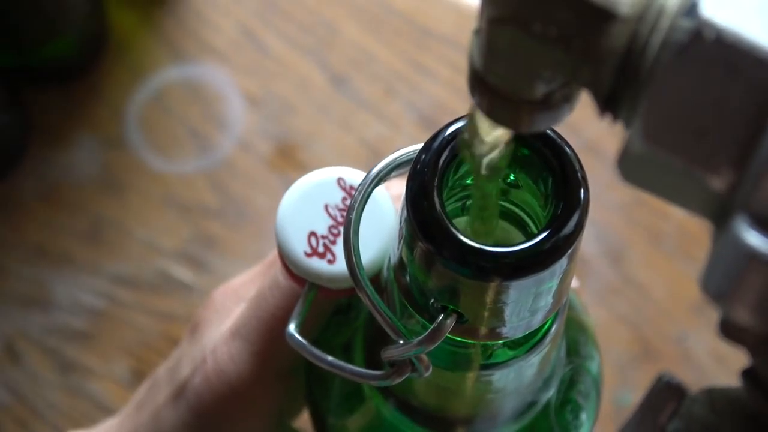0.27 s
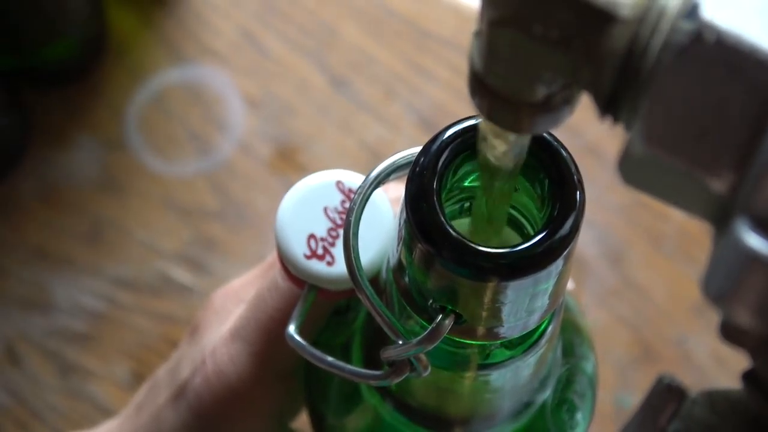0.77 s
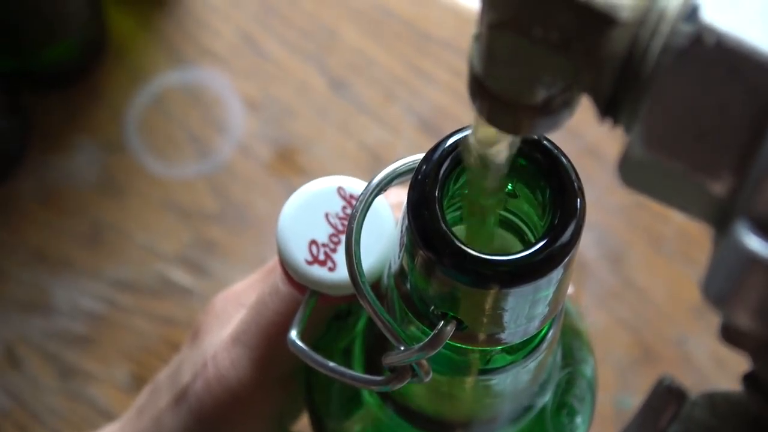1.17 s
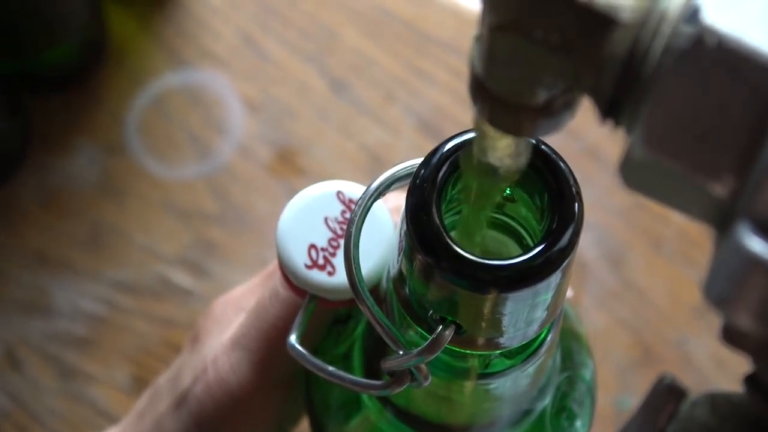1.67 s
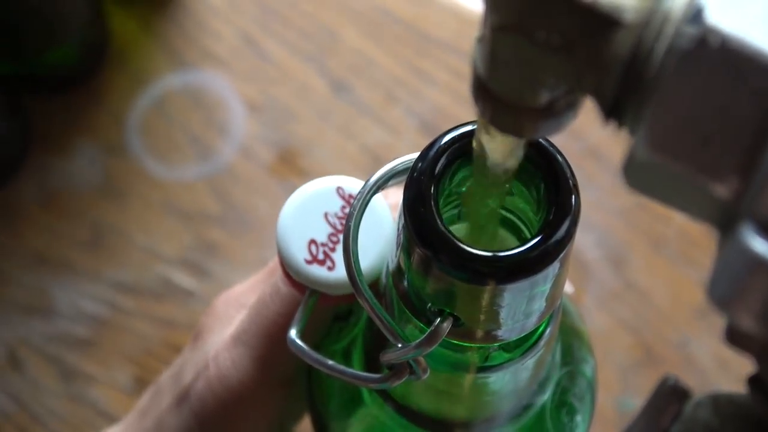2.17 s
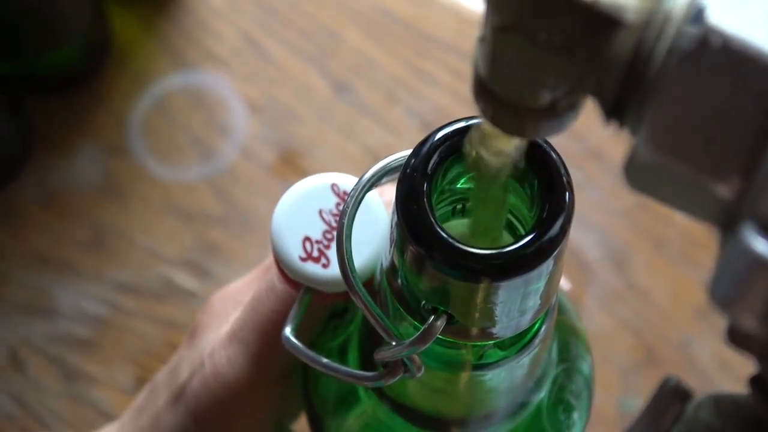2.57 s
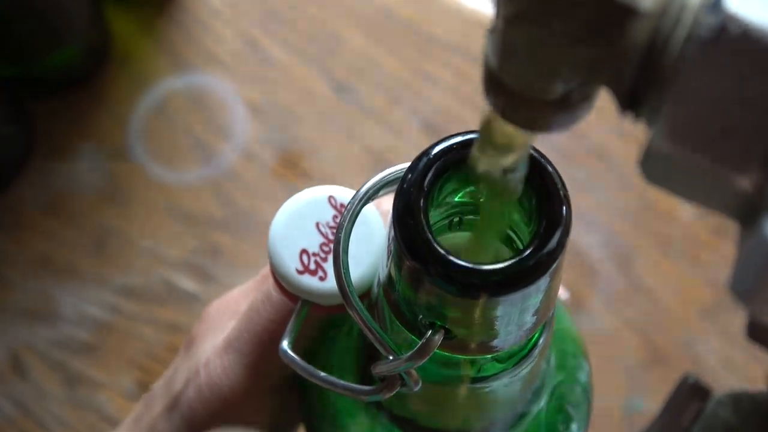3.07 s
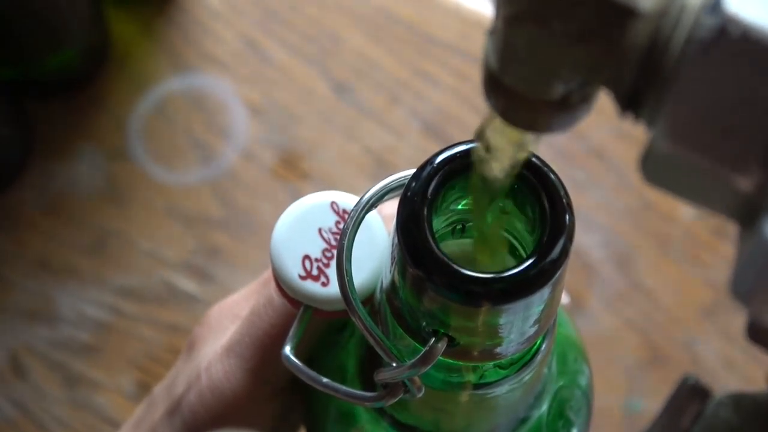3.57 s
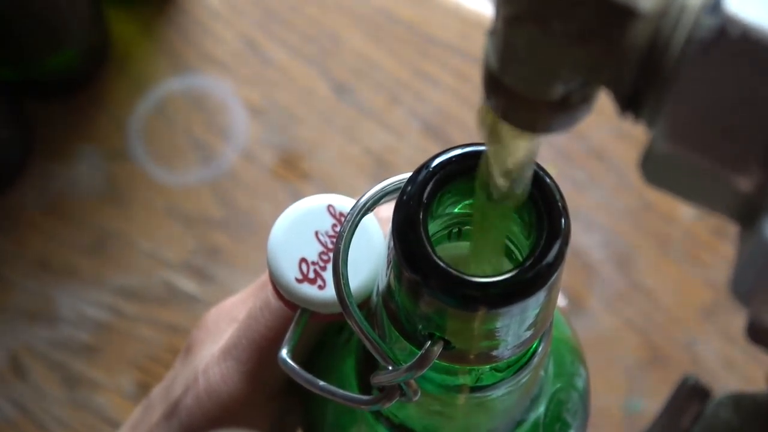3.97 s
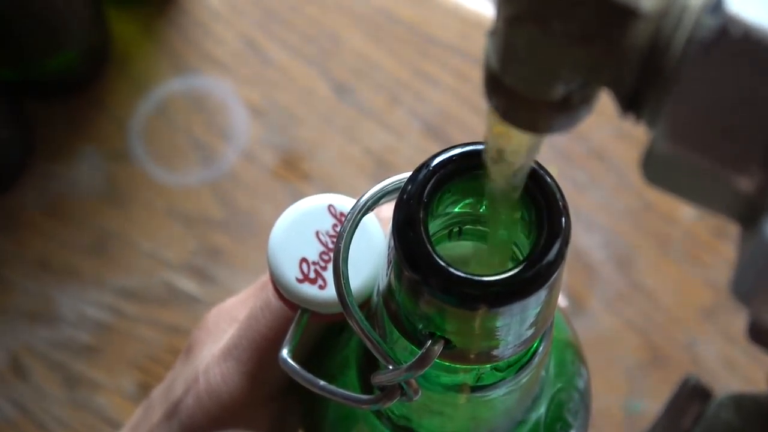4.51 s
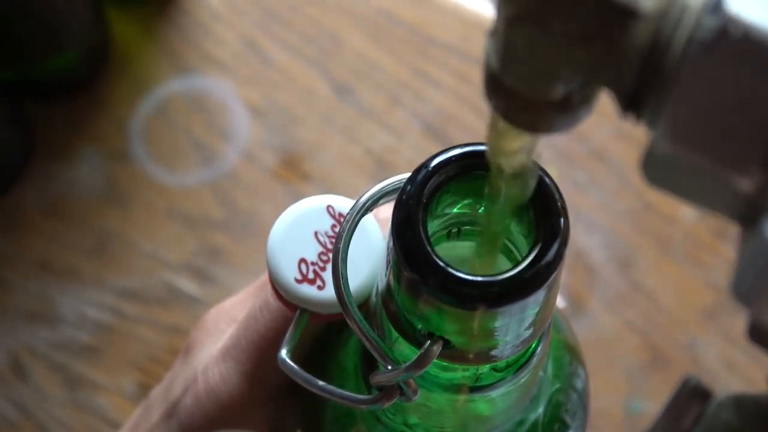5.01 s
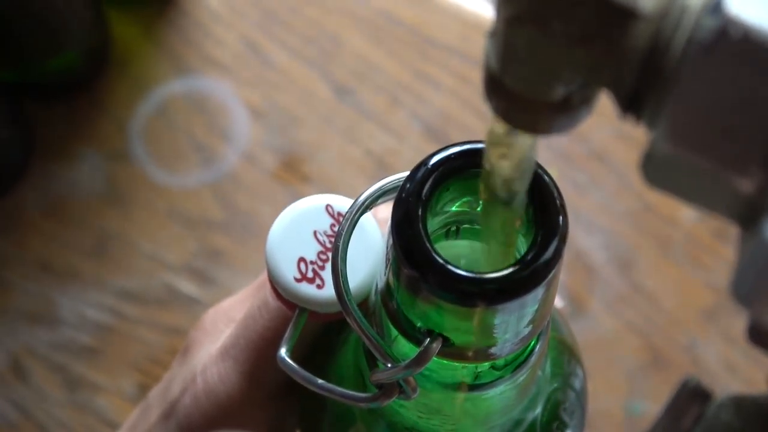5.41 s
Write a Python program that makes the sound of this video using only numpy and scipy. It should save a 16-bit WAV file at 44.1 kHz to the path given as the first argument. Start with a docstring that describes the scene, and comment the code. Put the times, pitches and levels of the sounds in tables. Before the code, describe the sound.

In a quiet kitchen, heard very close in narrow stereo, liquid runs from a metal spigot into a glass bottle. Faint splats grow into dense, sharp, glassy splashing with small pings that creep up in pitch. At about three seconds foam smothers the ringing, leaving low bubbling glugs, a soft churn and faint crackle, with fizz fading away.

```python
"""Sharp, bright splats come first: a stream from a spigot hits the bottom of a glass bottle.
Place: a quiet kitchen; distance: close; microphone: two ports a small way apart.
The splats (noise bursts through the bottle's modes) ring its air, whose notes creep up as it fills.
Then foam closes over the surface, damps the ringing and leaves low glugs (dying sines), a churn
(knocked resonances) and faint crackle and fizz (small bursts and hiss)."""
import sys
import numpy as np
from scipy import signal
from scipy.fft import rfft, irfft
from scipy.io import wavfile
from scipy.ndimage import uniform_filter1d

SR = 44100
rng = np.random.default_rng(int(sys.argv[2]) if len(sys.argv) > 2 else 0)


def wrap_up_sound(samples):
    """Save the sound to the file named by the first command line argument, as 16-bit audio."""
    columns = np.atleast_2d(samples).T
    # keep every value between -1 and 1, then stretch to whole-number steps
    tamed = np.clip(columns, -1, 1)
    steps = np.round(tamed * 32767).astype(np.int16)
    wavfile.write(sys.argv[1], SR, steps)


N = 249165
FOAM_S = 3.055  # the foam closes over the surface


def amp(db):
    """Amplitude factor of a level in dB."""
    return 10 ** (np.asarray(db) / 20)


def evened(x):
    """Scales a signal to an rms of 1."""
    return x / np.sqrt(np.mean(x ** 2) + 1e-20)


def read(points, hz):
    """Reads a curve over frequency, straight between points on a log scale."""
    f, value = np.transpose(points)
    return np.interp(np.log(hz + 1), np.log(f + 1), value)


def along(rows, column):
    """One column of a curve over time, sample by sample."""
    rows = np.array(rows)
    return np.interp(np.arange(N) / SR, rows[:, 0], rows[:, column])


def by_surface(s, is_open, under_foam):
    """Picks one value before the foam closes and another from then on."""
    return np.where(s < FOAM_S, is_open, under_foam)


def highpass(x, order, hz):
    """Takes away what lies below hz."""
    return signal.sosfilt(signal.butter(order, hz, "high", fs=SR, output="sos"), x)


def mode(f, hz, width_hz):
    """Response of a resonance, 1 at its centre."""
    return 1j * f * width_hz / (hz ** 2 - f ** 2 + 1j * f * width_hz + 1e-9)


def resonate(x, hz, width_hz):
    """A resonance on a moving pitch: shifts the curve hz down to zero, smooths, and shifts back."""
    turn = np.exp(2j * np.pi * np.cumsum(hz) / SR)
    r = np.exp(-np.pi * width_hz / SR)
    smooth = signal.lfilter([1 - r], [1, -r], x / turn)
    return 2 * (turn * smooth).real


def lay(s, sounds):
    """Sums short sounds at their times."""
    out = np.zeros(N + sounds.shape[1])
    starts = np.clip(np.round(s * SR).astype(int), 0, N - 1)
    np.add.at(out, starts[:, None] + np.arange(sounds.shape[1]), sounds)
    return out[:N]


def shaped(spectrum, patchy_db):
    """Noise of a given spectrum with drifting patches, rms 1."""
    hz = np.fft.rfftfreq(1024, 1 / SR)
    a, b, patches = rng.standard_normal((N // 256 + 5, 513, 3)).T
    patches = uniform_filter1d(patches, size=10, axis=0)
    patches = evened(uniform_filter1d(patches, size=10, axis=1))
    cells = (a + 1j * b) * amp(read(spectrum, hz)[:, None] + patchy_db * patches)
    return evened(signal.istft(cells, nperseg=1024, noverlap=768)[1][:N])


# damped air modes over foam: f/Hz, width/Hz, level/dB
FOAM_MODES = [(1800, 365, 19), (2285, 290, 18), (3080, 400, 15.5), (4840, 89, -2), (4900, 150, -15),
              (7670, 1400, 2.5), (10300, 1750, -1), (15300, 1800, -12)]


def foamed(f):
    """Response of the damped air over foam; neighbouring modes have opposite signs."""
    return sum((-1) ** k * amp(db) * mode(f, hz, w) for k, (hz, w, db) in enumerate(FOAM_MODES))


def gap(f):
    """A narrow band, held back, that never leaves the bottle mouth."""
    return 1 - mode(f, 4278, 990)


# air and glass modes of the empty bottle:
# f/Hz, rise/(Hz per s), width/Hz, level/dB, level drift/(dB per s as the liquid rises)
OPEN_MODES = [(1203, 48.5, 13.4, -19, 11), (1828, 54.5, 38, -5.5, 9), (2828, 48, 28, 4, 6.5),
              (3114, 47, 38, -9.5, 9.5), (3335, 65, 36, 2, 6), (4220, 52, 82, -6.5, 5),
              (4900, 2, 35, -2, 4.5), (6020, 18, 150, -11.5, 6.5), (6667, -64, 107, -1, 3.5),
              (7430, 65, 175, -7, 5.5), (7905, 12, 21, 14.5, -13.5), (8720, 10, 53, -1, 3),
              (9560, 9, 145, -7.5, 7), (10070, -40, 70, -3.5, 5), (11020, 18, 73, 2.5, 1.5),
              (12320, -7, 660, 1.5, 1.7), (13800, -9, 1190, -1.5, 0), (7900, -13, 1700, -16, 4.5)]
SIZE, STEP_S = 4096, 0.04  # burst length in samples; time between states of the bottle
WIDENING_PER_S, WIDENING_POWER = 0.34, 1.58  # at 2 kHz; the power makes high modes widen most
SLOSH_SHARE, SLOSH_DB = 0.005, 3.5  # random detuning, as a share of pitch, and unevenness in level


def bottle(s):
    """Response of the air in the bottle at each time s; the rising, frothing liquid damps the modes
    more and more, and its moving surface detunes them and rings them unevenly."""
    f = np.fft.rfftfreq(SIZE, 1 / SR)
    steps = np.arange(0, FOAM_S, STEP_S)[:, None]
    ringing = 0
    for k, (hz, rise, w, db, drift_db) in enumerate(OPEN_MODES):
        detune, strength = rng.standard_normal((2, len(steps), 1))
        pitch = (hz + rise * steps) * (1 + SLOSH_SHARE * detune)
        width = w * (1 + WIDENING_PER_S * steps * (hz / 2000) ** WIDENING_POWER)
        level_db = db + drift_db * steps + SLOSH_DB * strength
        ringing = ringing + (-1) ** k * amp(level_db) * mode(f, pitch, width)
    states = np.vstack([ringing, foamed(f)]) * gap(f)
    return states[by_surface(s, s // STEP_S, len(steps)).astype(int)]


LUMPS_DB, LUMPS_ONSET_SHARE = 8.5, 0.052  # a burst starts clean and breaks up after this share of its t60


def bursts(s, hz, t60, spread, snap, swell=0.025):
    """A snap and a lumpy puff of noise around hz that swells and dies, rung through the bottle; peak 1."""
    t, f = np.arange(SIZE // 4) / SR, np.fft.rfftfreq(SIZE, 1 / SR)
    noise, lumps = rng.standard_normal((2, len(s), len(t)))
    lumps = evened(uniform_filter1d(lumps, size=50, axis=1))  # droplets land unevenly within a splat
    age = t / t60[:, None]
    lumps_db = LUMPS_DB * lumps * np.minimum(age / LUMPS_ONSET_SHARE, 1)
    puff = noise * amp(lumps_db - 60 * age ** 1.06) * (1 - np.exp(-age / swell))
    puff[:, 0] += snap
    band = mode(f, hz[:, None], spread * hz[:, None]) ** 2
    out = irfft(rfft(puff, SIZE) * band * bottle(s), SIZE)
    out *= np.clip((SIZE - np.arange(SIZE)) / 512, 0, 1)  # fade the tail out
    return out / abs(out).max(1, keepdims=True)


# sharp splats of the broken stream: t/s, peak level/dB, centre f/Hz
SPLATS = [(0.072, -34, 12100), (0.129, -27, 8800), (0.174, -39, 10800), (0.219, -34.5, 8000),
          (0.2374, -29, 10400), (0.2623, -31, 11900), (0.288, -30.5, 6670), (0.306, -25, 11500),
          (0.327, -37, 7050), (0.365, -24.5, 8700), (0.395, -31.5, 9400), (0.4202, -27.5, 5800),
          (0.454, -40, 7800), (0.552, -36, 10600), (0.605, -29.5, 7000), (0.624, -32, 11500),
          (0.684, -30, 7150), (0.648, -24, 6250), (0.7006, -25, 10700), (0.7434, -26, 8800),
          (0.7564, -22.5, 7700), (0.804, -24.5, 7300), (0.818, -33, 8700), (0.8694, -14, 7550),
          (0.89, -33, 7400), (0.933, -26.5, 7940), (0.9627, -15, 5750), (1.058, -24, 8690),
          (1.081, -27, 7500), (1.1102, -28, 10050), (1.142, -28, 8050), (1.172, -22.5, 9800),
          (1.2059, -17, 7440), (1.248, -19, 5700), (1.267, -18, 9000), (1.288, -37, 9500),
          (1.373, -23, 9000), (1.619, -32, 9500), (1.3089, -22, 7060), (1.33, -24.5, 7450),
          (1.3604, -30, 8050), (1.383, -20.5, 10300), (1.41, -25, 9100), (1.449, -14, 9500),
          (1.4556, -11, 10200), (1.4842, -17.5, 5470), (1.51, -20.5, 8100), (1.561, -18.5, 9800),
          (1.6339, -18, 8850), (1.6606, -33, 7800), (1.682, -13, 6870), (1.7454, -27.5, 10300),
          (1.816, -20, 9400), (1.845, -22, 7450), (1.9018, -31, 9900), (1.93, -22, 8200),
          (1.9943, -16.5, 8100), (2.039, -19, 7300), (2.0972, -25.5, 8750), (2.1294, -17.5, 8050),
          (2.1546, -16, 6500), (2.1842, -21, 7060), (2.207, -22, 5700), (2.2253, -20, 8050),
          (2.246, -26, 10100), (2.2648, -26.5, 7050), (2.2923, -15, 8230), (2.341, -10.5, 9700),
          (2.3694, -24.5, 8800), (2.397, -19.5, 8100), (2.427, -20.5, 7900), (2.444, -23, 8550),
          (2.513, -23, 8000), (2.5356, -19.5, 7200), (2.5636, -21.5, 7300), (2.583, -16, 9800),
          (2.6154, -10.5, 5480), (2.6589, -18, 8050), (2.7637, -15.5, 9200), (2.8178, -15.5, 8600),
          (2.8851, -17.5, 7500), (2.9115, -16.5, 8700), (2.9538, -24, 8560), (2.9885, -24, 5340),
          (3.0165, -28.5, 7800), (3.0444, -21, 7000), (3.1395, -29.5, 8100), (3.1807, -36, 7100),
          (3.4845, -36.5, 10900), (3.5558, -34, 9250), (3.7064, -32.5, 7760), (3.7395, -31.5, 10700),
          (3.812, -33.5, 7350), (3.898, -33, 5500), (3.9765, -31.5, 6500), (4.015, -30.5, 7800),
          (4.0503, -34, 7200), (4.338, -34.5, 5500), (4.533, -36.5, 7240), (4.6872, -34.5, 5430),
          (4.9625, -41, 7140), (5.145, -46, 7600)]


def splats():
    """Bright wide bursts of the stream; louder splats start with a harder snap."""
    s, db, hz = np.transpose(SPLATS)
    snap = 18 * amp(0.03 * (db + 20.5))
    t60 = np.full(len(s), 0.028)
    return lay(s, amp(db)[:, None] * bursts(s, hz, t60, spread=0.69, snap=snap))


# pops of trapped air pockets that ring the bottle: t/s, peak level/dB, centre f/Hz
POPS = [(0.329, -42, 4800), (0.3672, -38, 2930), (0.42, -49, 4970), (0.577, -40.5, 3360),
        (0.767, -32.5, 3520), (0.8703, -17, 3160), (0.9543, -24, 4850), (0.932, -30.5, 2670),
        (0.96, -49, 3400), (1.0084, -30, 2900), (1.0791, -19.5, 4900), (1.1369, -28.5, 3500),
        (1.2052, -21.5, 4740), (1.222, -18.5, 3740), (1.308, -30, 3440), (1.3594, -34, 3580),
        (1.3717, -26, 2830), (1.4018, -28, 2880), (1.484, -18.5, 5130), (1.5282, -23.5, 3700),
        (1.562, -34, 2870), (1.582, -28.5, 3300), (1.634, -31.5, 3570), (1.7598, -44, 2980),
        (1.787, -36, 2930), (1.851, -26, 3080), (1.885, -37, 2920), (1.908, -30.5, 2920),
        (2.0383, -29.5, 3700), (2.101, -25, 3830), (2.127, -53, 3020), (2.1438, -31, 2960),
        (2.192, -28.5, 2960), (2.2677, -34, 3020), (2.2924, -22, 3050), (2.3393, -29.5, 2970),
        (2.3714, -32, 2970), (2.4736, -33.5, 2970), (2.5, -30, 3180), (2.5464, -28, 3580),
        (2.614, -26, 3470), (2.6835, -33.5, 2900), (2.7325, -31.5, 3600), (2.764, -35, 3600),
        (2.805, -32, 3000), (2.825, -28, 2960), (2.96, -38, 3600), (2.9887, -34.5, 2980),
        (3.202, -36, 1880), (3.556, -39, 1880), (3.695, -38, 1930), (3.74, -43, 1830), (3.794, -55, 3200),
        (3.8587, -40, 2010), (3.859, -36, 3470), (3.8998, -37, 3070), (3.902, -41, 2200),
        (3.977, -31.5, 3660), (4.016, -39, 1930), (4.0388, -39.5, 1760), (4.054, -33, 3820),
        (4.065, -40.5, 2080), (4.081, -43, 1900), (4.115, -40, 2100), (4.161, -48, 2280),
        (4.433, -51, 3300), (4.874, -41.5, 3240)]


def pops():
    """Narrower bursts that leave the low air modes ringing; large, low pockets take longer to burst."""
    s, db, hz = np.transpose(POPS)
    t60 = 0.008 * (3000 / hz) ** 1.6 * by_surface(s, 1, 0.76)  # shorter under foam
    return lay(s, amp(db)[:, None] * bursts(s, hz, t60, spread=0.31, snap=1.8))


# pings of the clearest standing waves, one list for each wave: t/s, level/dB
PINGS = [
    [(0.764, -42), (0.8338, -46), (0.8707, -52), (1.0099, -39), (1.2484, -51), (1.2668, -44), (1.3332, -44),
     (1.4484, -40), (1.5162, -46), (1.6599, -40), (1.6754, -40), (1.6968, -36.5), (1.7377, -45),
     (1.7597, -44), (1.8171, -32), (1.8615, -40), (1.8799, -36.5), (1.9697, -43), (2.1099, -64),
     (2.1433, -49), (2.1832, -42), (2.2092, -34.5), (2.2925, -35), (2.3419, -32), (2.4446, -45),
     (2.5429, -36), (2.5848, -31.5), (2.6187, -35), (2.6547, -38), (2.6786, -38), (2.712, -32),
     (2.7315, -31), (2.7824, -46), (2.8188, -38), (2.8662, -36), (2.8981, -36), (2.9405, -47),
     (2.9904, -35.5)],
    [(0.3502, -52), (0.458, -40), (0.5233, -43), (0.6071, -46), (0.6266, -39.5), (0.7269, -38),
     (0.7658, -40), (0.8351, -36), (0.901, -60), (0.9169, -34), (0.9967, -36), (1.1349, -30.5),
     (1.1718, -40), (1.2212, -39), (1.308, -35), (1.3295, -31.5), (1.3644, -44), (1.3749, -31.5),
     (1.4108, -52), (1.4482, -35.5), (1.5196, -43), (1.5425, -37), (1.5605, -35.5), (1.5969, -35),
     (1.6602, -36.5), (1.7001, -37), (1.751, -34), (1.8169, -48), (1.8802, -43), (1.9042, -36),
     (1.9276, -34), (1.9695, -40.5), (2.0987, -56), (2.1401, -43), (2.1681, -39), (2.1925, -38),
     (2.2279, -36.5), (2.2699, -39), (2.2988, -32.5), (2.3412, -34), (2.406, -50), (2.4295, -42),
     (2.4474, -33), (2.5198, -35), (2.5422, -32), (2.5647, -33), (2.5871, -46), (2.6151, -32),
     (2.6525, -35), (2.6829, -32), (2.7109, -42), (2.7518, -35), (2.7647, -33), (2.7967, -49),
     (2.8091, -39), (2.8316, -30), (2.9887, -36), (3.0167, -38)],
    [(0.365, -49), (0.4268, -47), (0.4952, -46), (0.5406, -44), (0.574, -41), (0.6408, -40), (0.7256, -42),
     (0.8708, -25), (0.9342, -36), (1.0065, -30), (1.1332, -49), (1.2215, -39), (1.256, -36), (1.3304, -40),
     (1.3732, -37), (1.4026, -31.5)],
    [(0.3271, -51), (0.3665, -43), (0.4203, -50), (0.5755, -42), (0.6408, -42), (0.7017, -53),
     (0.7256, -42), (0.7561, -40), (0.8703, -26), (0.9531, -42), (1.008, -39), (1.0788, -48),
     (1.1372, -35.5)],
    [(0.3283, -49), (0.4196, -54), (0.4949, -63), (0.5752, -53), (0.7548, -47), (0.8167, -40), (0.871, -39),
     (0.9543, -27), (1.0796, -28), (1.1723, -38), (1.2048, -32), (1.2477, -41), (1.307, -51), (1.3649, -47),
     (1.4442, -49), (1.4836, -27)],
]
# those waves: f/Hz in the empty bottle, rise/(Hz per s), t60/s, change of t60/(s per s)
WAVES = [(1211, 48.8, 0.12, -0.015), (1811, 56.8, 0.15, -0.039), (2800, 57, 0.085, -0.02),
         (3326, 55, 0.065, -0.017), (4894, 39, 0.074, -0.025)]


def pings():
    """Drops strike one standing wave alone: a clean dying note, pitched higher as the liquid rises."""
    t, out = np.arange(8192) / SR, 0
    for rows, (hz, rise, t60, change) in zip(PINGS, WAVES):
        s, db = (c[:, None] for c in np.transpose(rows))
        detune, phase = rng.random((2, len(s), 1))
        pitch = (hz + rise * s) * (1 + 0.0025 * (2 * detune - 1))
        shape = (1 - np.exp(-t / 0.00094)) * amp(-60 * t / (t60 + change * s))
        out = out + lay(s[:, 0], amp(db) * shape * np.sin(2 * np.pi * (pitch * t + phase)))
    return out


# between the events: t/s, fine spray level/dB, small pops level/dB
PATTER = [(0.0, -75, -85), (0.3, -60.5, -63.5), (0.9, -45.5, -53), (1.8, -52, -48.5), (2.95, -47, -48.5),
          (3.12, -58.5, -56), (4.1, -53.5, -59), (4.2, -57.5, -56.5), (5.0, -60.5, -63), (5.65, -65, -66)]
FOAM_LOW_HZ, FOAM_LOW_RISE = 1540, 260  # lowest pop that gets through the foam; its climb in Hz per s


def patter(column, low_hz, high_hz, count, uneven_db, foam_uneven_db, spread, t60):
    """Many small random bursts, a few of them larger; under foam they are shorter and more alike."""
    when, pitch, size = rng.random((3, count))
    s = when * N / SR
    foam_low_hz = np.maximum(low_hz, FOAM_LOW_HZ + FOAM_LOW_RISE * (s - FOAM_S))
    low_hz = by_surface(s, low_hz, foam_low_hz)
    hz = low_hz * (high_hz / low_hz) ** pitch
    size_db = by_surface(s, uneven_db, foam_uneven_db) * (np.minimum(-np.log(size + 1e-9), 3) - 1.5)
    t60 = t60 * by_surface(s, 1, 0.6)
    grains = amp(size_db)[:, None] * bursts(s, hz, t60, spread, snap=0.24, swell=0.13)
    return amp(along(PATTER, column)) * evened(lay(s, grains))


def fine_spray():
    """Small bright wide bursts between the splats."""
    return patter(1, 4940, 10900, count=2200, uneven_db=10.5, foam_uneven_db=6.5, spread=0.72, t60=0.02)


def small_pops():
    """Small lower, narrower bursts between the pops."""
    return patter(2, 1140, 4980, count=1400, uneven_db=4.0, foam_uneven_db=2.5, spread=0.37, t60=0.036)


# finest spray, spectrum: f/Hz, relative level/dB per Hz
MIST = [(4300, -33), (5000, -3), (6000, -8), (8000, 1), (11000, 0.5), (13000, 6), (16000, -2.5)]
# its loudness: t/s, level/dB before the flicker
MIST_LEVEL = [(0.1, -72), (0.4, -67), (0.62, -60), (0.9, -56.5), (1.6, -54.5), (2.2, -64.5), (3.03, -72),
              (3.08, -78)]


def mist():
    """The finest droplets merge into a flickering hiss that sinks away as the foam closes."""
    flicker = uniform_filter1d(rng.standard_normal(N), size=300)
    flicker = evened(uniform_filter1d(flicker, size=300))
    return amp(along(MIST_LEVEL, 1) + 5.0 * flicker) * shaped([(100, -90)] + MIST, patchy_db=2.5)


# large bubbles under the surface: t/s, peak level/dB before the bass cuts, f/Hz
GLUGS = [(1.816, -40, 753), (2.291, -41.5, 633), (2.369, -34.5, 550), (2.443, -50, 734), (2.474, -49, 690),
         (2.508, -54, 590), (2.541, -40.5, 650), (2.562, -45, 804), (2.66, -34, 496), (2.662, -53, 826),
         (2.693, -40, 520), (2.731, -36, 433), (2.732, -40, 690), (2.826, -43.5, 615), (2.865, -46, 780),
         (2.896, -42, 603), (2.966, -39, 670), (2.989, -41.5, 580), (3.054, -34, 420), (3.065, -28.5, 296),
         (3.13, -32.5, 418), (3.135, -31, 285), (3.152, -44, 290), (3.183, -38, 340), (3.206, -37.5, 335),
         (3.261, -36, 283), (3.288, -38, 304), (3.302, -40, 334), (3.336, -36, 296), (3.349, -39.5, 298),
         (3.398, -35, 307), (3.433, -29, 286), (3.481, -32, 308), (3.497, -32.5, 304), (3.558, -23, 296),
         (3.6, -37, 334), (3.646, -44, 327), (3.702, -30, 337), (3.74, -32, 302), (3.8, -39.5, 323),
         (3.861, -34, 300), (3.895, -25, 298), (3.94, -36, 317), (3.972, -34.5, 322), (3.955, -41, 333),
         (4.0, -32, 375), (4.017, -26.5, 360), (4.041, -36, 440), (4.065, -27, 326), (4.068, -30, 437),
         (4.08, -28.5, 318), (4.098, -49, 340), (4.1, -40, 480), (4.116, -37, 406), (4.189, -38.5, 338),
         (4.255, -45, 340), (4.343, -38, 360), (4.464, -44, 324), (4.5, -39.5, 289), (4.629, -41.5, 317),
         (4.562, -38, 340), (4.67, -39, 340), (4.755, -46.5, 626), (4.859, -44, 386), (4.971, -46.5, 452),
         (5.105, -44.5, 450)]
GLUG_RISE_PER_S = 4.0  # open surface: the pitch climbs by this share per s
GLUG_SETTLE, GLUG_SETTLE_S = 0.04, 0.006  # under foam: it starts higher by a share and settles


def glugs():
    """Dying sines with a soft start: they chirp up at the open surface and settle down under foam."""
    s, db, hz = (c[:, None] for c in np.transpose(GLUGS))
    t = np.arange(4096) / SR
    bend = by_surface(s, 1 + GLUG_RISE_PER_S * t, 1 + GLUG_SETTLE * np.exp(-t / GLUG_SETTLE_S))
    shape = (1 - np.exp(-t / 0.0018)) ** 2 * amp(-60 * (t / 0.038) ** 1.25)
    tone = np.sin(2 * np.pi * np.cumsum(hz * bend, 1) / SR)
    return lay(s[:, 0], amp(db) * shape / shape.max() * tone)


def hollow(rows, modes, knocks_per_s, uneven_db):
    """Random knocks keep low resonances sounding while their curve lasts."""
    t = np.arange(N) / SR
    start, end = rows[0][0], rows[-1][0]
    strength = amp(uneven_db * np.minimum(rng.exponential(1, N), 4))
    knocks = strength * (rng.random(N) < knocks_per_s / SR) * rng.choice([-1., 1.], N)
    ring = 0
    for hz, rise, width_hz, db in modes:
        pitch = hz + rise * (t - start)
        once = resonate(knocks, pitch, width_hz)
        ring = ring + amp(db) * evened(resonate(once, pitch, 0.7 * width_hz))
    gate = np.clip((t - start) / 0.047, 0, 1) * np.clip((end + 0.011 - t) / 0.0095, 0, 1)
    return amp(along(rows, 1)) * gate * evened(ring)


# churn of bubbles under the foam: t/s, level/dB before the gate and bass cuts
CHURN = [(3.06, -44), (3.3, -50), (3.6, -42.5), (3.85, -49), (4.08, -35), (4.16, -45), (4.45, -53),
         (4.72, -49), (5.0, -58.5), (5.65, -58.5)]
# its resonances: f/Hz at the start, rise/(Hz per s), first-pass width/Hz, relative level/dB
CHURN_MODES = [(287, 4.6, 76, -0.5), (327.6, 26.9, 55, -0.5), (442, 53, 250, -17), (747, 6.8, 106, -15)]


def churn():
    """Bubbles under the foam knock slowly rising resonances."""
    return hollow(CHURN, CHURN_MODES, 400, uneven_db=2.5)


# loose seething of small bubbles as the pour calms: t/s, level/dB before the gate
SEETHE = [(3.8, -57), (5.65, -56.5)]
# its resonances: f/Hz at the start, rise/(Hz per s), first-pass width/Hz, relative level/dB
SEETHE_MODES = [(304, 30, 216, 3), (357, 51.5, 69, 0), (608, 29, 100, -4)]


def seethe():
    """Denser knocks on rising resonances, for the small bubbles."""
    return hollow(SEETHE, SEETHE_MODES, 900, uneven_db=-1.5)


# neck-and-belly air note: t/s, level/dB before the gate
AIR_NOTE = [(0.3, -76), (1.2, -64.5), (1.3, -61.5), (1.7, -63.5), (1.81, -52.5), (2.28, -62), (2.36, -47),
            (2.48, -62.5), (2.71, -48), (2.82, -71), (2.95, -48), (3.05, -61)]


def air_note():
    """The air in neck and belly sounds one low note at 156 Hz, rising 3.5 Hz per s."""
    return hollow(AIR_NOTE, [(156, 3.5, 26, 0)], 380, uneven_db=-1.0)


# low rush of the flow, spectrum: f/Hz, relative level/dB per Hz
RUSH = [(140, -10), (240, -9.5), (368, -1), (458, -11.5), (614, 5.5), (706, 0), (802, 3.5), (892, -1.5),
        (1220, 1), (1340, -61), (2600, -120)]
# its loudness: t/s, level/dB before the bass cut
RUSH_LEVEL = [(0.0, -66), (1.8, -54.5), (2.9, -53), (3.2, -61), (5.65, -63.5)]


def rush():
    """Low patchy noise of the flow."""
    return amp(along(RUSH_LEVEL, 1)) * shaped(RUSH, patchy_db=3.0)


FIZZ_DB, FIZZ_FADE_DB_PER_S = -58, -7.5  # level as the foam closes, before its 0.11 s rise; fade
FIZZ_THIN_S, FIZZ_THIN_HZ = 2.8, 2120  # over this time the fizz loses what lies below this pitch


def fizz():
    """Countless tiny bubbles merge into an even hiss once the foam closes; it thins from below and fades."""
    f, age = np.fft.rfftfreq(N, 1 / SR), np.arange(N) / SR - FOAM_S
    hiss = evened(irfft(rfft(rng.standard_normal(N)) * foamed(f) * gap(f), N))
    lows = irfft(rfft(hiss) / (1 + (f / FIZZ_THIN_HZ) ** 10), N)
    hiss = hiss - np.clip(age / FIZZ_THIN_S, 0, 1) * lows
    return amp(FIZZ_DB + FIZZ_FADE_DB_PER_S * age) * np.clip(age / 0.11, 0, 1) * hiss


def walls(x, t60, gap_s):
    """Reflections as sparse taps of random sign."""
    t = np.arange(SR // 4) / SR
    hits = rng.choice([-1., 1.], len(t)) * (rng.random(len(t)) < 3000 / SR)
    taps = hits * amp(-60 * t / t60) * (t > gap_s)
    return signal.oaconvolve(x, taps / np.linalg.norm(taps))[:N]


# room tone spectrum: f/Hz, relative level/dB per Hz
ROOM = [(15, -57), (25, -24.5), (108, -13.5), (422, -13.5), (568, -16.5), (634, -7.5), (1220, -10.5),
        (1300, -17), (1620, -18), (2100, -17), (2900, -22), (4020, -25.5), (4360, -27), (4730, -24.5),
        (7510, -19.5), (14400, -40), (16500, -50)]
# high hiss spectrum: f/Hz, relative level/dB per Hz
HISS = [(5000, -42), (9000, -2), (12000, -2), (15000, -12), (16500, -12)]


def kitchen():
    """Quiet room tone with an even high hiss 17 dB below it."""
    return shaped(ROOM, patchy_db=1.3) + amp(-17) * shaped(HISS, patchy_db=1.2)


def ports(near, other, share, apart_db):
    """Left and right from two close microphone ports: middle plus and minus side."""
    side = irfft(share * rfft(near) + amp(apart_db) * rfft(other), N)
    return np.array([near + side, near - side])


# side signal of the water against the middle: f/Hz, share in step, share a quarter turn ahead,
# unrelated level/dB
WATER_PORTS = [(100, -.06, 0, -30), (250, -.11, 0, -30), (480, -.11, 0, -26), (650, .03, 0, -17),
               (950, .06, 0, -16), (1250, 0, 0, -19), (1600, 0, 0, -33), (3500, 0, 0, -30),
               (4300, -.06, 0, -21), (5300, -.12, -.07, -21), (6000, -.05, .1, -19), (7000, -.08, 0, -17),
               (7600, .03, .12, -16), (8300, -.04, -.06, -17), (10400, -.06, .2, -18),
               (11000, .1, .05, -20), (12000, 0, 0, -23), (16000, 0, 0, -23)]
# the same for the kitchen: f/Hz, share in step, unrelated level/dB
ROOM_PORTS = [(30, -.04, -6), (80, -.04, -9), (150, 0, -15), (450, 0, -14), (600, .25, -15), (950, .3, -17),
              (1250, -.3, -13), (1600, 0, -24), (3000, 0, -34), (4500, 0, -18), (11000, 0, -18),
              (16000, 0, -24)]


def scene():
    """The water with its reflections, close to the two ports, over the kitchen behind it."""
    water = splats() + pops() + pings() + fine_spray() + small_pops() + mist()
    water += highpass(glugs() + churn(), 6, 235)  # glugs and churn keep to the band above 235 Hz
    water += seethe() + air_note() + rush() + fizz()
    water = highpass(water, 4, 110)  # cut the deep bass below 110 Hz
    water += amp(-16.5) * walls(water, t60=0.22, gap_s=0.0012)
    hz = np.fft.rfftfreq(N, 1 / SR)
    step, turn, apart_db = (read(np.array(WATER_PORTS)[:, [0, k]], hz) for k in range(1, 4))
    mix = ports(water, walls(water, t60=0.012, gap_s=0), step + 1j * turn, apart_db)
    step, apart_db = (read(np.array(ROOM_PORTS)[:, [0, k]], hz) for k in range(1, 3))
    return mix + amp(-64.5) * ports(kitchen(), kitchen(), step, apart_db)


def record(dry):
    """Lowpass at 15950 Hz: nothing sounds above it."""
    lowpass = signal.firwin(511, 15950, window=("kaiser", 9), fs=SR)
    return signal.oaconvolve(dry, lowpass[None], "same")


dry = scene()
out = record(dry)
wrap_up_sound(out)
```